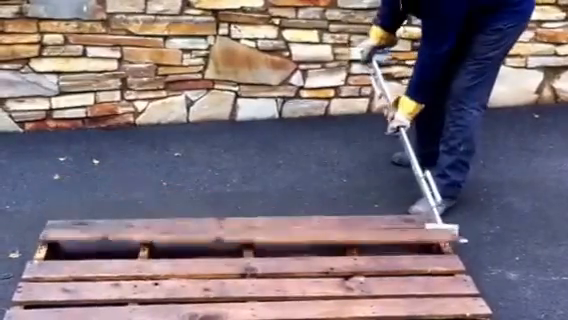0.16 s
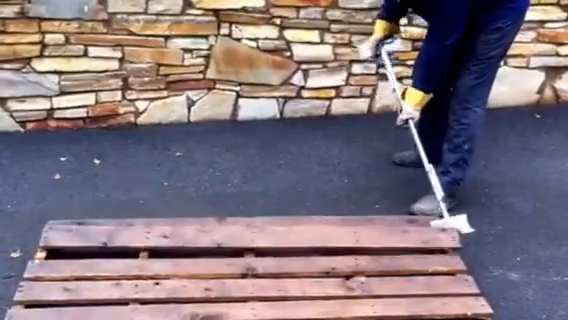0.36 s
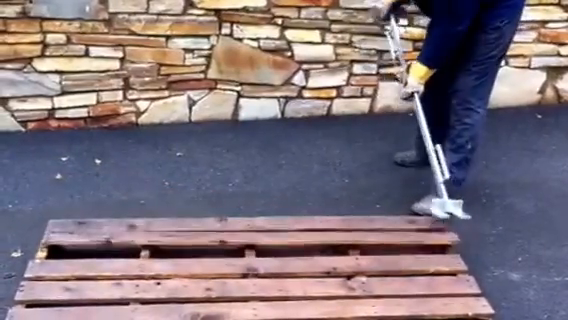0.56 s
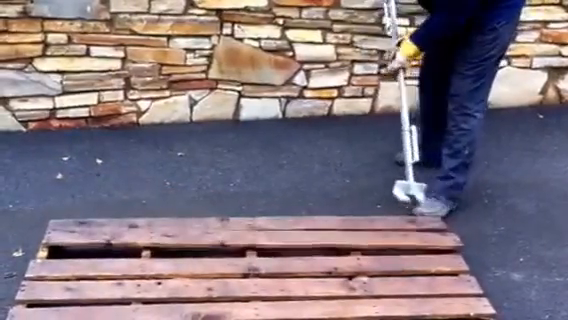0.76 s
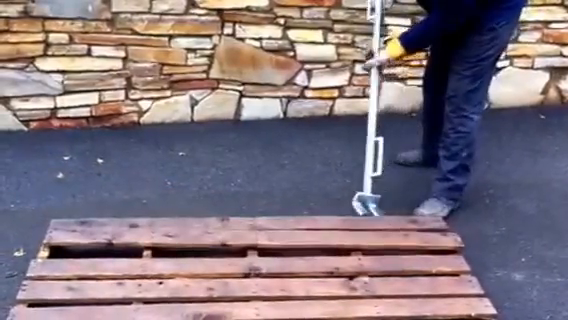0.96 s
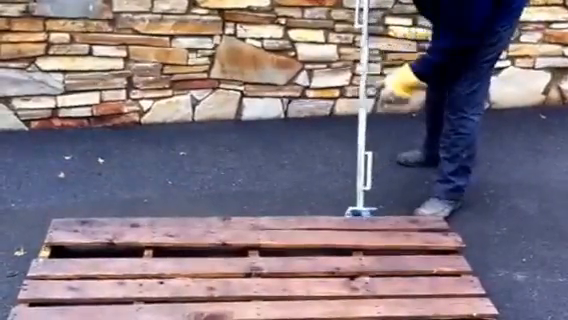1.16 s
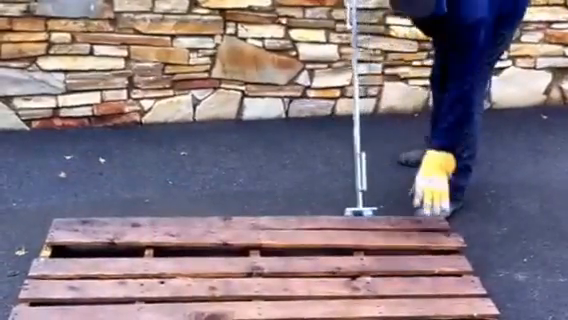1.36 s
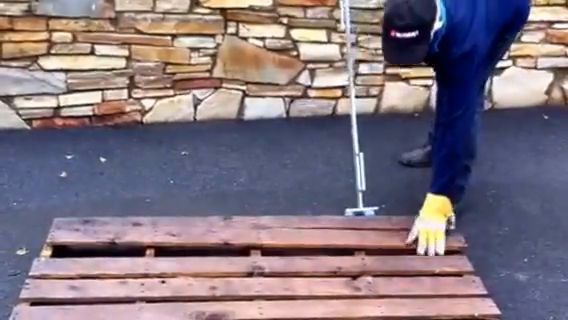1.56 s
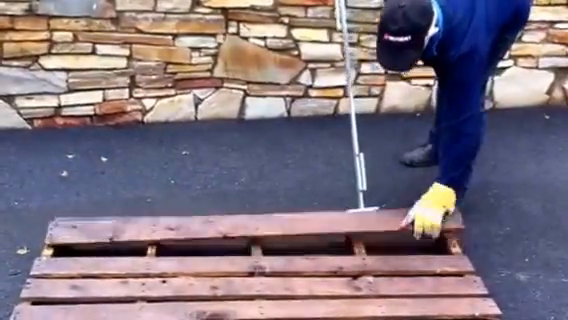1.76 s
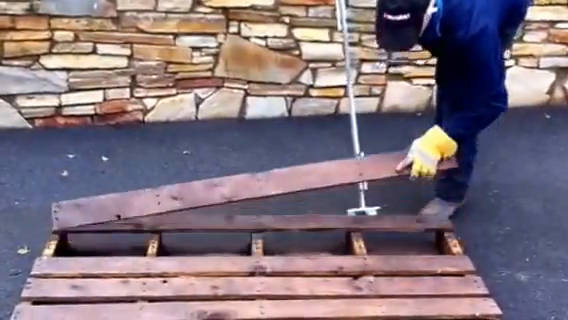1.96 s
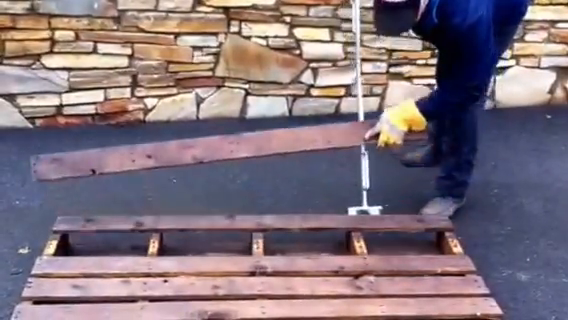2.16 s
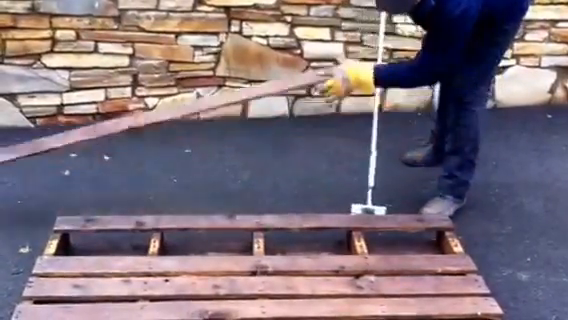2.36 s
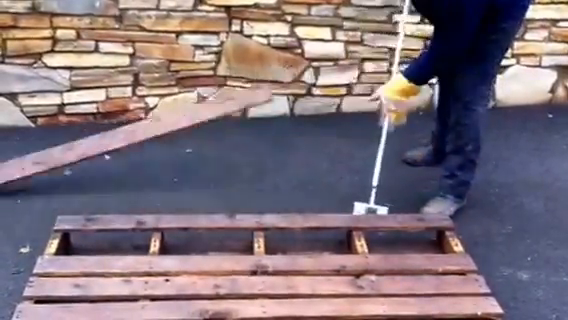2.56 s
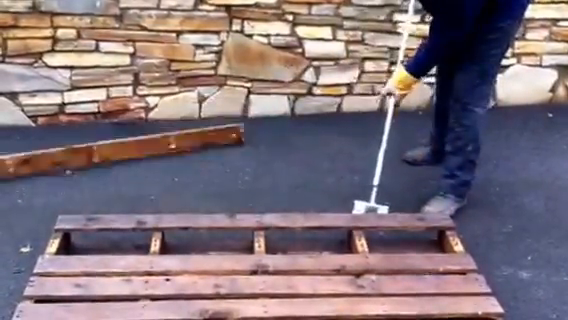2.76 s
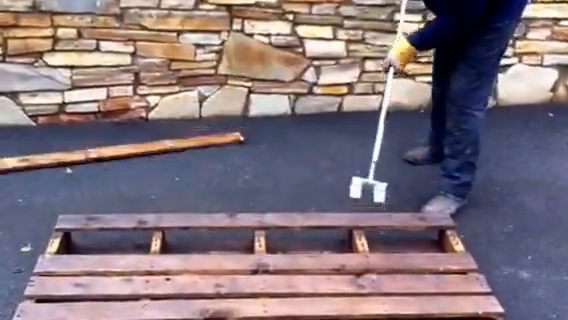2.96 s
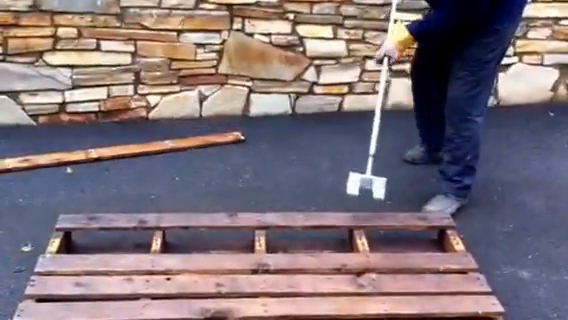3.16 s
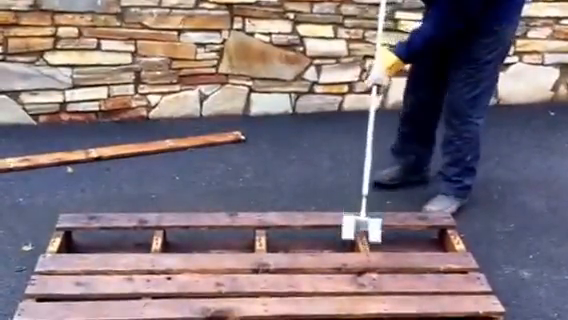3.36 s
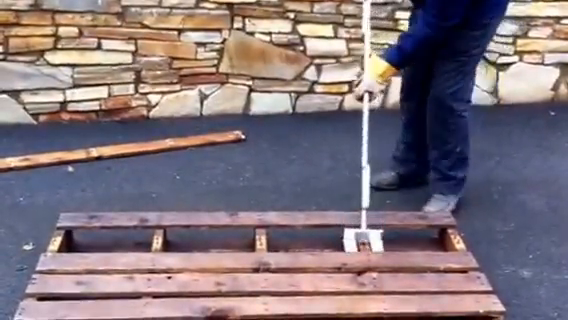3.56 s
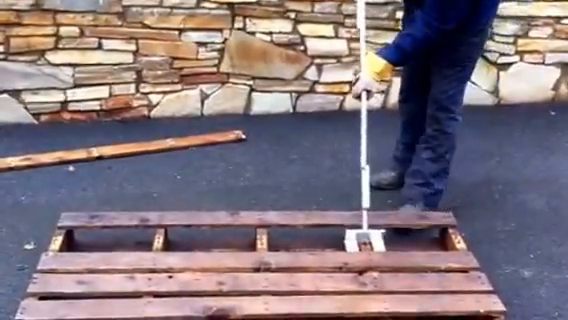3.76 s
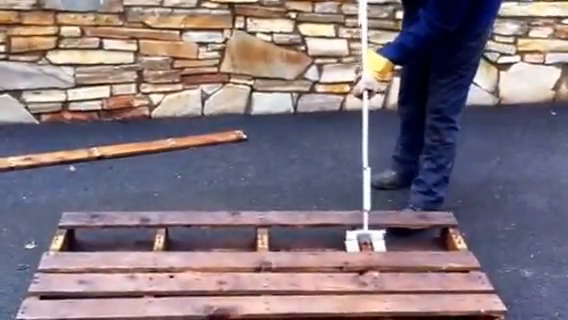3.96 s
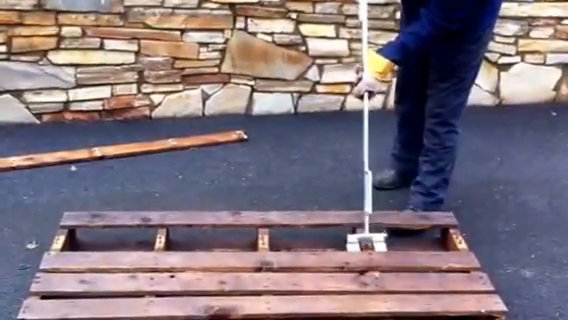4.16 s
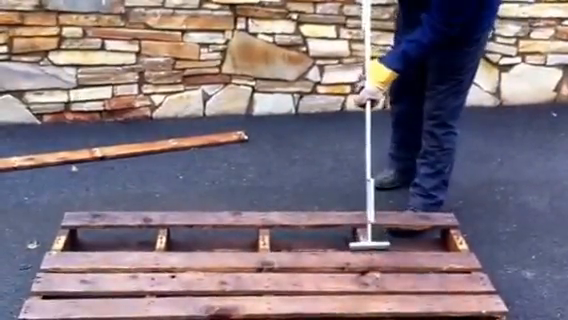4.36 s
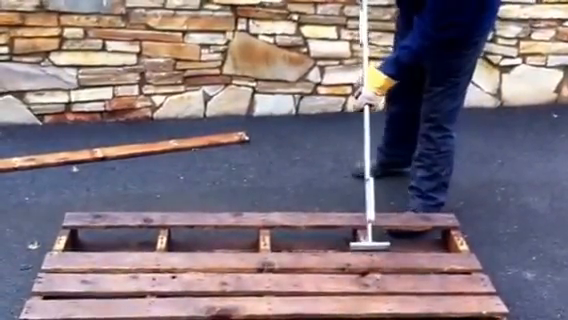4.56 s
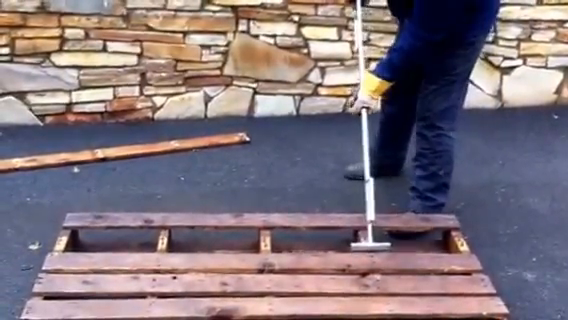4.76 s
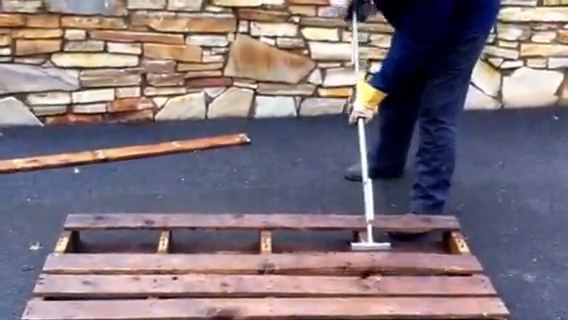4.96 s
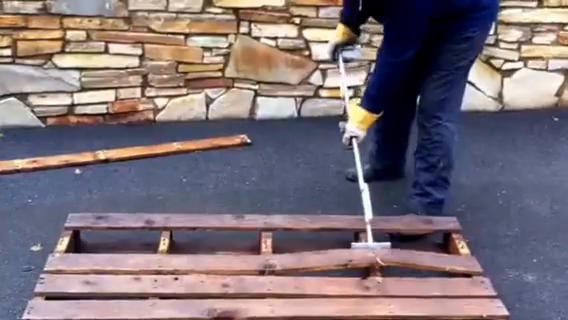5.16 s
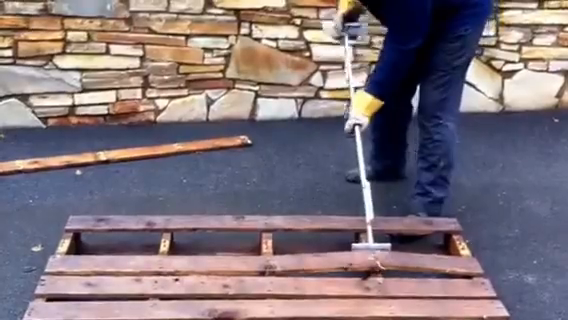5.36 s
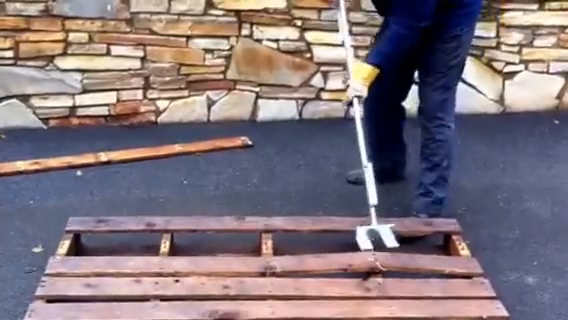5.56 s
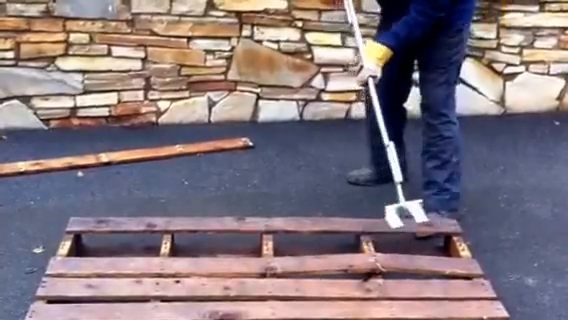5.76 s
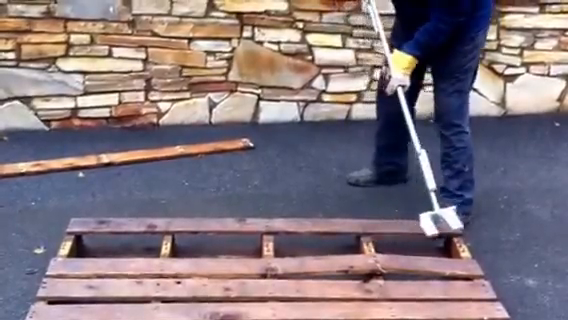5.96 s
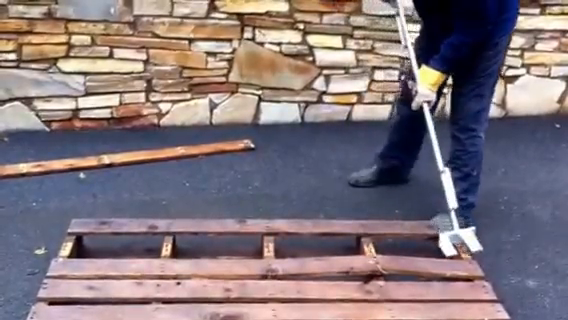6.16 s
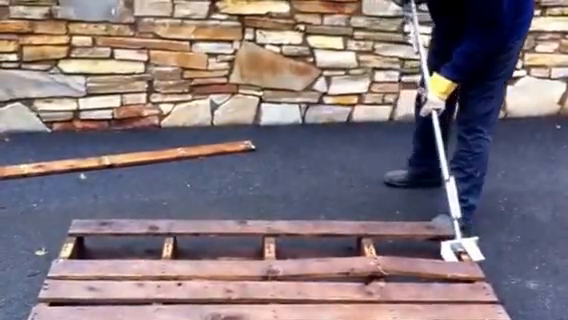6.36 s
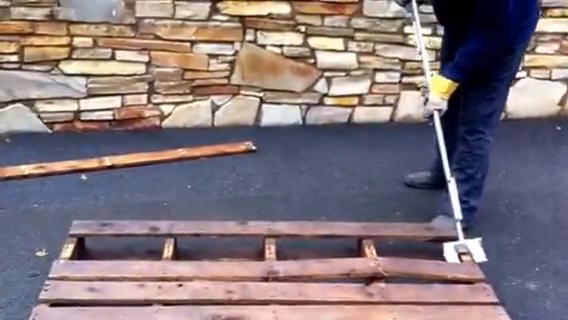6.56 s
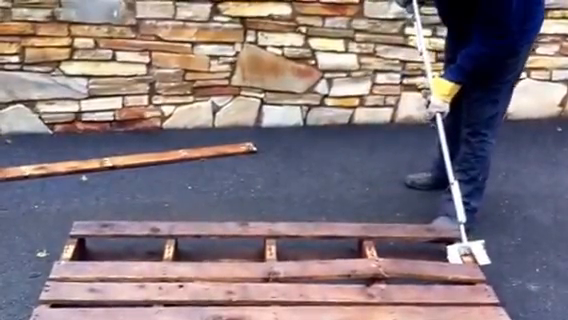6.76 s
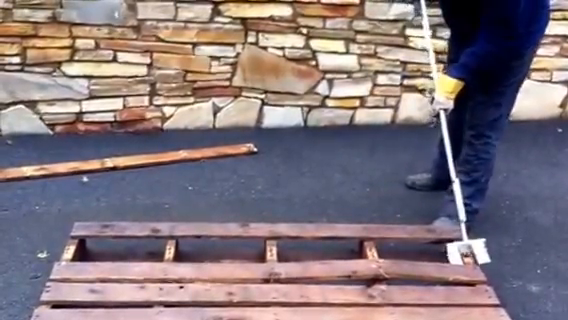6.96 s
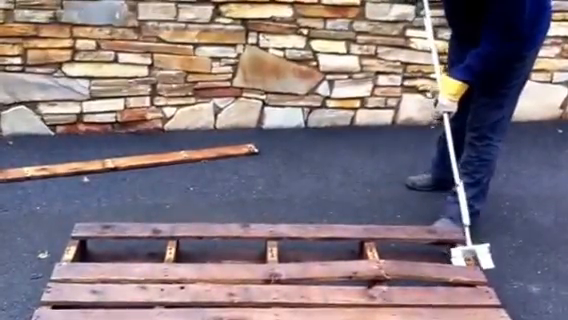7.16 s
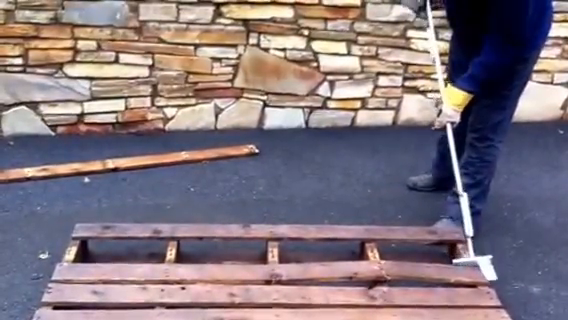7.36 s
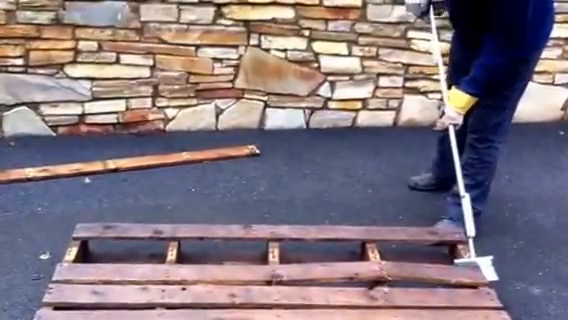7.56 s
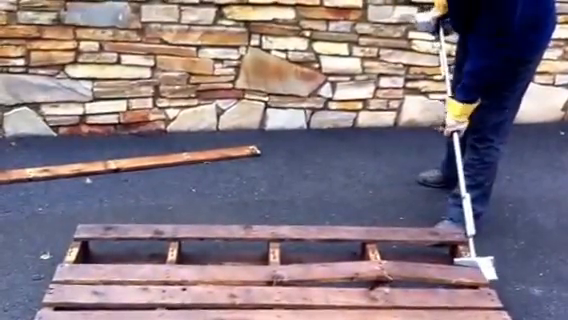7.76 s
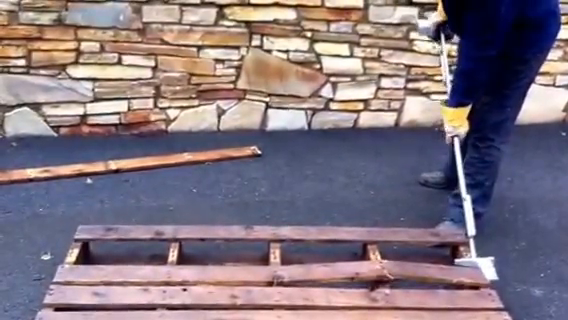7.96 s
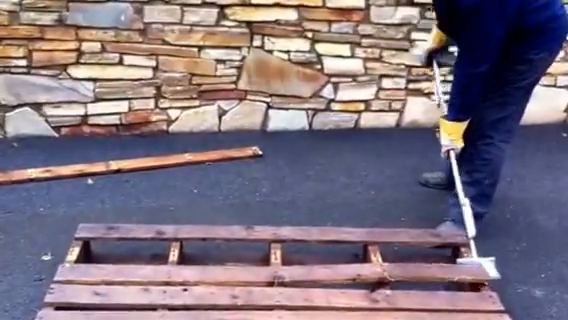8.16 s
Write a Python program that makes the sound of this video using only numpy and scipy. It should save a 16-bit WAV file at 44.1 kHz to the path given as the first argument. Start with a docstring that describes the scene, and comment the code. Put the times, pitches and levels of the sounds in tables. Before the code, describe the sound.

Outdoors beside a stone wall, a pried pallet board clatters down hard at once. Light bar knocks and a soft ringing steel clang on asphalt follow, then a thrown board slams and bounces. The bar knocks the pallet again, tiny ticks build to one hard splitting crack, wood groans briefly, and soft knocks continue under faint distant whistles and gusty wind. Open microphone a few metres away, short wall echo.

```python
"""Nails crack and loose boards clatter as a wooden pallet is levered apart; a steel bar knocks, then clangs on asphalt.
More boards fall, thin whistles begin, the bar knocks again, small ticks lead to one hard crack, then wood groans.
Whistles and a long gust close it; scrapes, wind bumps and a steady hush run through, with a stone wall's echo.
Impacts are noisy contact forces through decaying modes; scrapes, wind and hush are coloured noise;
groans are harmonics under a sliding resonance; whistles are noise-blurred gliding sines."""
import sys
import numpy as np
from scipy import signal
from scipy.fft import rfft, irfft
from scipy.io import wavfile
from scipy.ndimage import uniform_filter1d

SR = 44100
rng = np.random.default_rng(int(sys.argv[2]) if len(sys.argv) > 2 else 0)


def dump(signal):
    """Clip the signal to [-1, 1] and save it as 16-bit WAV at the path in sys.argv[1]."""
    limited = np.clip(np.atleast_2d(signal).T, -1, 1)
    pcm = np.round(limited * 32767).astype(np.int16)
    wavfile.write(sys.argv[1], SR, pcm)


N = 361619
TIME_S = np.arange(N) / SR
KNOCK_FIZZ_DB = -20  # fizz of landings and bar knocks, relative to their snap


def undb(db):
    """Decibels to amplitude gain."""
    return 10 ** (np.asarray(db) / 20)


def unit(x):
    """Scale to rms 1."""
    return x / np.sqrt(np.mean(x ** 2) + 1e-20)


def seconds(length_s):
    """Time axis of a short sound."""
    return np.arange(int(length_s * SR)) / SR


def fade(t, t60_s):
    """Exponential decay, 60 dB in t60_s."""
    return np.exp(-np.log(1000) * t / t60_s)


def envelope(t, attack_s, hold_s, release_t60_s):
    """Linear rise from time 0; exponential decay starts at hold_s."""
    return np.clip(t / attack_s, 0, 1) * fade(np.maximum(t - hold_s, 0), release_t60_s)


def swell(t, taper):
    """Smooth rise and fall over a short sound."""
    return signal.windows.tukey(len(t), min(taper, 1))


def add(out, start_s, x):
    """Mix x into out at start_s."""
    i = max(int(start_s * SR), 0)
    out[i:i + len(x)] += x[:max(N - i, 0)]


def band(x, low_hz, high_hz):
    """Causal band-pass."""
    sos = signal.butter(3, [low_hz, min(high_hz, SR * .49)], "band", fs=SR, output="sos")
    return signal.sosfilt(sos, x)


def colour(x, points, size=2048):
    """Minimum-phase filter through (Hz, dB) points, built by folding the cepstrum."""
    hz, gain_db = np.transpose(points)
    grid_hz = np.maximum(np.fft.rfftfreq(size, 1 / SR), 1)
    curve_db = np.interp(np.log(grid_hz), np.log(hz), gain_db)
    cepstrum = irfft(np.log(undb(curve_db)))
    cepstrum[1:size // 2] *= 2
    cepstrum[size // 2 + 1:] = 0
    impulse = irfft(np.exp(rfft(cepstrum)))
    return signal.fftconvolve(x, impulse)[:len(x)]


def loudest(x, size=220):
    """RMS level in dB of the strongest few milliseconds."""
    return 10 * np.log10(uniform_filter1d(x ** 2, size).max() + 1e-20)


def landings():
    """Blows of a falling board: one edge lands, then the face slaps down, weaker and duller."""
    # loose boards on pallet and asphalt: start_s, peak_db, thump_db and snap_db (both re peak)
    landing_rows = [(0.115, -12.5, -17.5, -30.5), (0.159, -12, -13, -24), (0.209, -29, -12, -19.5),
                    (0.277, -20.5, -13.5, -33), (0.308, -4, -25.5, -24), (0.329, -3, -25, -19),
                    (0.552, -40, -6.5, -9.5), (2.696, -25, -15, -27), (2.808, 5, -26.5, -40),
                    (2.84, -6.5, -28.5, -24), (2.874, -23, -16, -31), (2.91, -31, -23, -19),
                    (3.03, -5, -31.5, -32), (3.046, -19, -27, -6.5), (3.137, -38, -10.5, -5.5)]
    slap_delay_s, slap_db, slap_dull_db = 0.0065, -4.5, -6.5
    for start_s, peak_db, thump_db, snap_db in landing_rows:
        treble_db = snap_db + np.array([0, KNOCK_FIZZ_DB])
        yield start_s, peak_db, thump_db, *treble_db
        yield start_s + slap_delay_s, peak_db + slap_db, thump_db, *(treble_db + slap_dull_db)


def fractures():
    """Blows of a nail giving way: a bright crack, then the freed wood recoils, duller and heavier."""
    # nails giving way, fibres ticking under the forks: start_s, peak_db, fizz_db (re peak)
    crack_rows = [(0.041, -33.5, -13), (0.076, -35, -2.5), (2.621, -27.5, -10.5), (3.502, -50, -18.5),
                  (4.001, -46, -31), (4.02, -46.5, -39), (4.256, -50, -28.5), (4.42, -52, -16),
                  (4.489, -54, -12), (4.812, -53.5, -13.5), (4.918, -52.5, -21), (5.085, -39, -7.5),
                  (5.1, -29, -12), (5.166, -27.5, 1), (5.226, -8, -11.5), (5.26, -24.5, -18.5),
                  (6.535, -45, -21), (7.3, -51.5, -5.5), (7.466, -52, -28), (7.504, -46, -29),
                  (7.966, -50.5, -25)]
    thump_at_0db_db, thump_slope = -26, 0.31  # lighter cracks keep more thump (dB per dB)
    base_snap_db, snap_share = 1, 0.65  # snap re peak; share of the fizz level added to it
    recoil_delay_s, recoil_db, recoil_thump_db, recoil_dull_db = .0085, -3, -11, -7.5
    for start_s, peak_db, fizz_db in crack_rows:
        treble_db = np.array([base_snap_db + snap_share * fizz_db, fizz_db])
        yield start_s, peak_db, thump_at_0db_db - thump_slope * peak_db, *treble_db
        yield start_s + recoil_delay_s, peak_db + recoil_db, recoil_thump_db, *(treble_db + recoil_dull_db)


def bar_knocks():
    """Single blows of the bar on the pallet: the fizz follows the snap."""
    # bar against pallet: start_s, peak_db, thump_db and snap_db (both re peak)
    knock_rows = [(0.661, -25, -15.5, -43), (0.975, -35, -13.5, -44.5), (1.796, -32, -10, -24),
                  (1.857, -33, -12, -32), (3.61, -25.5, -8, -18.5), (3.68, -40, -2.5, -22),
                  (3.758, -24.5, -22.5, -34.5), (3.79, -29, -18, -33), (4.4, -40, 3.5, -22.5),
                  (5.591, -36, -13, -20.5), (5.627, -32, -9, -32.5), (6.381, -23.5, -5, -22),
                  (7.319, -24.5, -13, -25.5), (7.397, -27.5, -9.5, -39)]
    for start_s, peak_db, thump_db, snap_db in knock_rows:
        yield start_s, peak_db, thump_db, snap_db, snap_db + KNOCK_FIZZ_DB


def board(force, resonances, detune=0.021, scatter_db=2.0):
    """A force heard directly and through the board's modes, detuned and reweighted at random per blow."""
    t = np.arange(len(force)) / SR
    hz, t60_s, gain_db = np.transpose(resonances)[:, :, None]
    pitch, weight = rng.standard_normal((2, len(resonances), 1))
    decay = fade(t, t60_s)
    ringing = np.cos(2 * np.pi * hz * (1 + detune * pitch) * t)
    modes = 2 * decay / decay.sum(axis=1, keepdims=True) * ringing
    response = (undb(gain_db + scatter_db * weight) * modes).sum(axis=0)
    return force + signal.fftconvolve(force, response)[:len(t)]


def blows(events, contact, modes, chatter_t60_s, chatter_db, settle_db, rise_s,
          rattle_t60_s, rattle_db, splinter, crest_db):
    """Each blow is a click, a burst of micro-contacts and a longer rattle driving the board's modes."""
    # thump, body, snap and fizz bands: low_hz, high_hz
    level_bands = [(150, 450), (500, 2400), (2800, 7000), (8000, 15000)]
    out, t = np.zeros(N), seconds(.3)
    for start_s, peak_db, thump_db, *treble_db in events:
        grains, noise = rng.standard_normal((2, len(t)))
        # a hard blow is over at once, a gentle one builds up and settles slowly
        slowness = undb(-settle_db * np.tanh(peak_db / 30))
        onset = np.minimum(t / (rise_s * slowness), 1)
        chatter = grains ** 3 * fade(t, chatter_t60_s * slowness) * onset
        # splintering breaks the rattle into separate grains
        rattle = noise * np.abs(noise) ** splinter * fade(t, rattle_t60_s) * onset
        chatter = undb(chatter_db) * chatter / np.linalg.norm(chatter)
        rattle = undb(rattle_db) * rattle / np.linalg.norm(rattle)
        force = slowness * (chatter + rattle)
        force[0] += 1  # click
        hit = colour(board(force, modes), contact)
        # correct the colour towards the wanted level in each band
        levels_db = peak_db + np.array([thump_db, -crest_db, *treble_db])
        correction = [(np.sqrt(low_hz * high_hz), level_db - loudest(band(hit, low_hz, high_hz)))
                      for (low_hz, high_hz), level_db in zip(level_bands, levels_db)]
        add(out, start_s, colour(hit, correction))
    return out


def bar_clang(strike_db=-4, grit_db=-9, gain_db=0):
    """Each fork strikes the asphalt, then chatters as it skids, and sets the steel bar ringing."""
    # forks touching down as the bar is stood up: start_s, skid_s, level_db, treble_db
    fork_rows = [(1.218, 0.0084, -33, -5.5), (1.266, 0.036, -35, 1)]
    # ring of the steel bar: pitch_hz, t60_s, level_db
    bar_modes = [(703, 0.77, -5.5), (842.5, 0.13, 11), (1165, 0.08, 6.5), (1324, 0.059, 4.5),
                 (1464, 0.99, -6), (1776, 0.063, 4), (2201, 0.28, 4), (2299, 0.46, 0.5), (2406, 0.15, 2),
                 (2506, 1.27, -5), (2961, 0.23, -6), (4484, .2, -4), (4570, 0.43, -1), (4850, 0.22, -7),
                 (5730, 0.07, -7.5)]
    clang_s, t = fork_rows[0][0], seconds(0.92)
    chatter = unit(rng.standard_normal(len(t)) ** 3)
    skids = []
    for start_s, skid_s, level_db, treble_db in fork_rows:
        shape = envelope(clang_s + t - start_s, attack_s=0.0086, hold_s=skid_s, release_t60_s=0.2)
        skid = chatter * undb(level_db) * shape
        skid[int((start_s - clang_s) * SR)] += undb(strike_db) * np.linalg.norm(skid)
        skids.append((skid, undb(treble_db)))
    force = sum(skid for skid, treble in skids)
    ring = 0
    for pitch_hz, t60_s, level_db in bar_modes:
        # treble gain fades in over the octave above 1200 Hz
        treble_part = np.clip(np.log2(pitch_hz / 1200), 0, 1)
        push = sum(skid * treble ** treble_part for skid, treble in skids)
        mode = np.sin(2 * np.pi * pitch_hz * t) * fade(t, t60_s)
        ring = ring + undb(level_db) * unit(signal.fftconvolve(push, mode)[:len(t)])
    grit = colour(force, [(40, -3), (200, -3), (1400, 9.5), (3500, -8), (6000, -10), (7500, -17)])
    clang = unit(ring) + undb(grit_db) * unit(grit)
    out = np.zeros(N)
    add(out, clang_s, np.std(force) * undb(gain_db) * clang)
    return out


def scrapes(rough_db=4):
    """Sliding contact: a dense spray of tiny slips of uneven strength."""
    # wood, gloves and soles sliding: start_s, length_s, level_db, tilt_db_per_octave
    scrape_rows = [(0.032, 0.048, -36, 3), (0.067, 0.071, -36, 2.5), (1.167, 0.055, -48, -1.5),
                   (1.605, 0.14, -56, 1), (2.355, 0.15, -50.5, 0.5), (5.023, 0.065, -44.5, 4),
                   (5.573, 0.158, -54, -5.5), (5.908, 0.091, -57, 2), (6.532, 0.099, -48, 1),
                   (8.074, 0.16, -55, 7.5)]
    surface = [(100, -20.0), (400, -4.5), (1000, 5.5), (2600, 0.0),
               (3700, -9.0), (6000, -7), (8500, -22), (16000, -25.5)]
    out = np.zeros(N)
    for start_s, length_s, level_db, tilt_db in scrape_rows:
        t = seconds(length_s)
        noise = rng.standard_normal(len(t))
        roughness = np.interp(t, np.linspace(0, length_s, 40), rng.standard_normal(40))
        slips = noise * undb(rough_db * roughness)
        tilted = [(hz, gain_db + tilt_db * np.log2(hz / 2000)) for hz, gain_db in surface]
        add(out, start_s, undb(level_db) * unit(colour(slips, tilted)) * swell(t, 0.64))
    return out


def groans(width=0.17, jitter=0.086):
    """Uneven stick-slip pulses ring a resonance that slides as the contact moves."""
    # steel rubbing on wood: start_s, length_s, slip_rate_hz, first_resonance_hz, last_resonance_hz, level_db
    groan_rows = [(5.727, 0.065, 133, 940, 630, -49.5), (5.734, 0.084, 170, 327, 283, -45.5),
                  (5.995, 0.078, 410, 787, 1150, -54), (6.391, 0.081, 102, 379, 317, -50)]
    out = np.zeros(N)
    for start_s, length_s, rate_hz, first_hz, last_hz, level_db in groan_rows:
        t = seconds(length_s)
        wobble = np.interp(t, np.linspace(0, length_s, 20), rng.standard_normal(20))
        phase = 2 * np.pi * np.cumsum(rate_hz * (1 + jitter * wobble)) / SR
        centre_hz = np.linspace(first_hz, last_hz, len(t))
        sound = 0
        for k in range(1, 10):
            offset = (k * rate_hz / centre_hz - 1) / width
            sound = sound + np.sin(k * phase) / (1 + offset ** 2)
        add(out, start_s, undb(level_db) * unit(sound * swell(t, 0.74)))
    return out


def yard(x, near_t60_s=0.3, near_db=-10, far_t60_s=0.77, far_db=-25, onset_s=0.015):
    """Ground and wall scatter the sound back quickly; a faint dull tail follows from further off."""
    t = seconds(.8)
    near_colour = [(100, -1.0), (400, 0.5), (2000, 0.5), (6000, -1.0), (14000, -9.5)]
    far_colour = [(100, 8.5), (1500, -1.0), (3000, -1.0), (9000, -23.5)]
    near_decay, far_decay = fade(t, near_t60_s), fade(t, far_t60_s)
    near = colour(rng.standard_normal(len(t)), near_colour) * near_decay / np.linalg.norm(near_decay)
    far = colour(rng.standard_normal(len(t)), far_colour) * far_decay / np.linalg.norm(far_decay)
    echo = undb(near_db) * near + undb(far_db) * far
    return x + signal.fftconvolve(x, echo * np.minimum(t / onset_s, 1))[:N]


def whistles(width=0.043, waver=0.018, patchy_db=3.8):
    """Sines blurred by slow noise that glide and waver in the distance, swelling and fading."""
    # faint gliding whistles: start_s, length_s, first_hz, last_hz, level_db (before the swell)
    whistle_rows = [(2.6, 0.27, 5700, 5400, -60), (3.132, 0.26, 5370, 5040, -74),
                    (3.271, 0.36, 4100, 3900, -71), (3.685, 0.3, 4650, 4100, -64),
                    (6.245, 0.33, 5150, 5950, -73), (6.713, 0.095, 1880, 1820, -55.5),
                    (6.741, 0.34, 1950, 1690, -70), (6.62, 0.46, 979, 828, -62.5),
                    (6.914, 0.343, 749, 675, -66), (7.2, 0.53, 5300, 6950, -67)]
    out = np.zeros(N)
    for start_s, length_s, first_hz, last_hz, level_db in whistle_rows:
        t = seconds(length_s)
        blur = band(rng.standard_normal(len(t)), 1, width * first_hz)
        knots_s = np.linspace(0, length_s, 10)
        patches, wobble = (np.interp(t, knots_s, row) for row in rng.standard_normal((2, 10)))
        pitch_hz = np.linspace(first_hz, last_hz, len(t)) * (1 + waver * wobble)
        phase = 2 * np.pi * np.cumsum(pitch_hz) / SR
        tone = unit(blur * undb(patchy_db * patches) * np.sin(phase))
        add(out, start_s, undb(level_db) * tone * np.hanning(len(t)))
    return out


def wind(gust_db=0, flutter_db=6.5, buffet_hz=170):
    """Eddies at the microphone: a fluttering noise rumble and a few short sine bumps."""
    # gusts: start_s, hold_s, level_db
    gust_rows = [(0.554, 0.21, -53.5), (1.53, .38, -48.5), (7.092, 3, -46.5)]
    # single buffets: centre_s, level_db, width_s
    buffet_rows = [(.822, -40, 0.0054), (1.19, -42, 0.02), (1.778, -31.5, 0.015), (1.879, -29, 0.0049),
                   (7.44, -35, 0.028), (7.718, -16.5, 0.0024), (8.169, -21.5, 0.0052)]
    gust = sum(undb(level_db) * envelope(TIME_S - start_s, attack_s=0.023, hold_s=hold_s, release_t60_s=1.7)
               for start_s, hold_s, level_db in gust_rows)
    flutter = np.minimum(unit(band(rng.standard_normal(N), 4.16, 26.1)), 1.6)
    eddies = rng.standard_normal(N) * undb(flutter_db * flutter)
    rumble = colour(eddies, [(30, -31.5), (70, -5.0), (120, 4.5), (180, 4.5),
                             (280, -7.5), (450, -22.5), (3000, -65.0)])
    out = undb(gust_db) * gust * unit(rumble)
    for centre_s, level_db, width_s in buffet_rows:
        t = seconds(.1) - .1 / 2
        bump = np.sin(2 * np.pi * buffet_hz * t) / np.cosh(2 * t / width_s)
        add(out, centre_s + t[0], undb(level_db) * bump)
    return out


def background(over_treble_db=13):
    """Steady outdoor hush: coloured noise whose level drifts slowly."""
    # spectrum of the hush: freq_hz, density_db_per_hz (relative)
    air_colour = [(18, -53), (30, -30), (111, -4.5), (284, 0.5), (400, -6.5), (2130, -10.5), (3490, -17.5),
                  (15500, -28.5)]
    # drift of the hush: time_s, treble_level_db (the whole hush lies over_treble_db higher)
    air_drift = [(0.0, -70.5), (0.411, -70.5), (6.212, -76), (8.2, -72)]
    time_s, treble_level_db = np.transpose(air_drift)
    level_db = np.interp(TIME_S, time_s, treble_level_db) + over_treble_db
    return unit(colour(rng.standard_normal(N), air_colour)) * undb(level_db)


def scene():
    """The work on the pallet echoes in the yard; whistles, wind and hush are added without echo."""
    # colours of a falling board, a blunt bar knock and a fracture: freq_hz, gain_db
    clatter_colour = [(30, -50.5), (110, -19.5), (220, -3.5), (540, -2), (850, 0), (1400, 5.5), (2500, -1),
                      (3300, -8.5), (6500, -20.5), (9000, -38), (16000, -53.5)]
    blunt_colour = [(30, -49), (110, -23), (250, -5.5), (460, -3.5), (650, -4.5), (1500, -2), (2200, -4.5),
                    (3000, -23), (6500, -14.5), (9000, -22), (16000, -39.5)]
    split_colour = [(40, -29), (140, -15.5), (330, -2), (800, -4), (1700, 2), (2900, 0), (6500, -3),
                    (8500, -17.5), (16000, -23)]
    # modes of a loose board and of boards nailed in the pallet, before scatter:
    # pitch_hz, t60_s, gain_db (re direct contact)
    loose_modes = [(304.2, 0.07, 2), (621, 0.2, 0.5), (757, 0.11, 3.5), (1160, 0.18, -2), (1674, 0.14, -1),
                   (2246, 0.09, 3)]
    nailed_modes = [(338, 0.033, 6), (394, 0.06, 1), (640, 0.083, -3.5), (826, 0.013, 3),
                    (1450, 0.06, -2.5), (1694, 0.07, 2.5), (1896, .045, -1), (2150, 0.11, 1),
                    (3500, 0.045, 1)]
    boards = blows(landings(), clatter_colour, loose_modes,
                   chatter_t60_s=0.025, chatter_db=5.5, settle_db=5.5, rise_s=0.00088,
                   rattle_t60_s=0.19, rattle_db=-3.0, splinter=0.95, crest_db=8.0)
    knocks = blows(bar_knocks(), blunt_colour, nailed_modes,
                   chatter_t60_s=0.043, chatter_db=2.5, settle_db=10, rise_s=0.00073,
                   rattle_t60_s=0.32, rattle_db=-5, splinter=0.095, crest_db=11.0)
    cracks = blows(fractures(), split_colour, nailed_modes,
                   chatter_t60_s=0.022, chatter_db=7.0, settle_db=7.5, rise_s=0.0014,
                   rattle_t60_s=0.099, rattle_db=-0.5, splinter=1.0, crest_db=2.0)
    work = boards + knocks + cracks + bar_clang() + scrapes() + groans()
    return (yard(work) + whistles() + wind() + background())[None]


def record(dry, low_cut_hz=70, top_hz=16000):
    """Peaks are held just under full scale; the recorder thins the deep bass and cuts the top."""
    clipped = np.clip(dry, -.85, .85)
    low_cut = signal.butter(1, low_cut_hz, "high", fs=SR, output="sos")
    top_cut = signal.ellip(10, .2, 80, top_hz, fs=SR, output="sos")
    return signal.sosfilt(top_cut, signal.sosfilt(low_cut, clipped))


dry = scene()
out = record(dry)
dump(out)
```